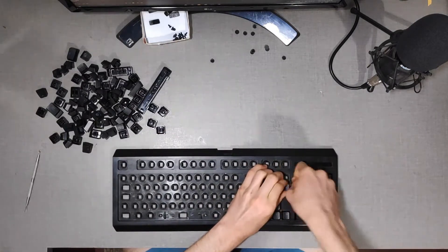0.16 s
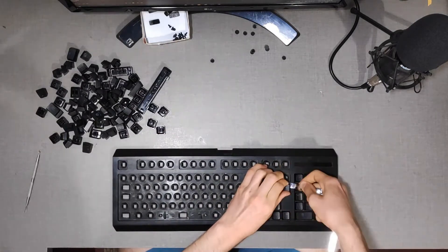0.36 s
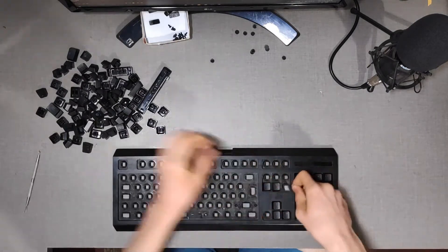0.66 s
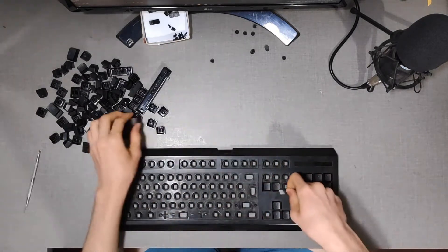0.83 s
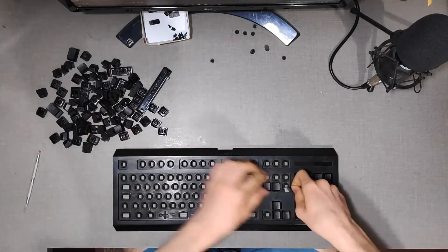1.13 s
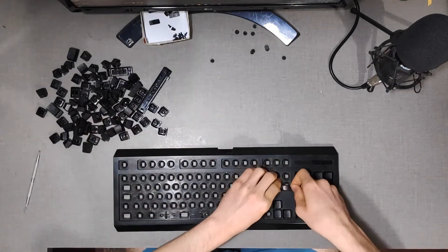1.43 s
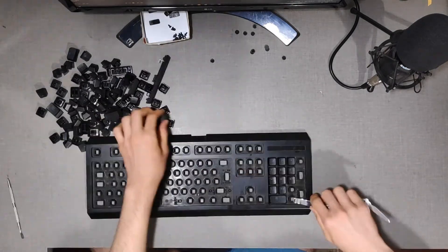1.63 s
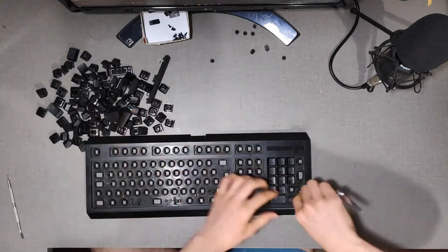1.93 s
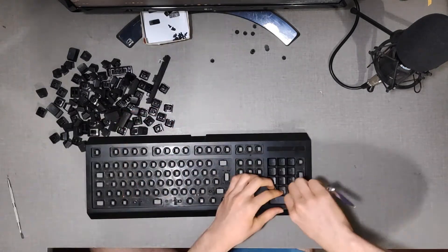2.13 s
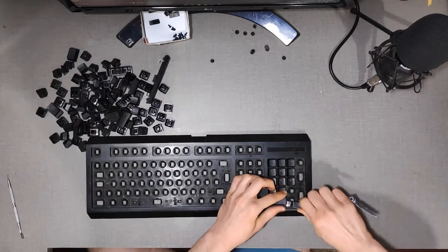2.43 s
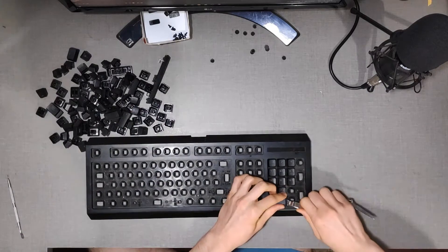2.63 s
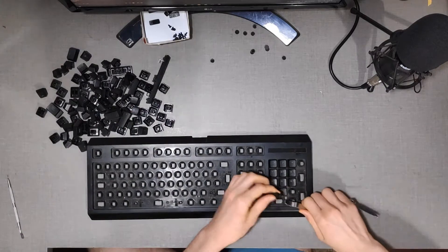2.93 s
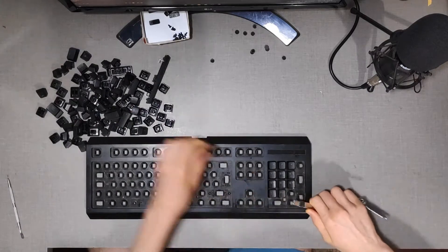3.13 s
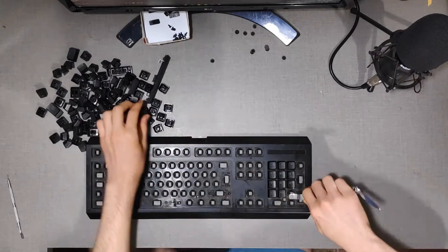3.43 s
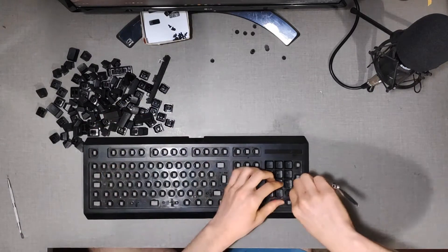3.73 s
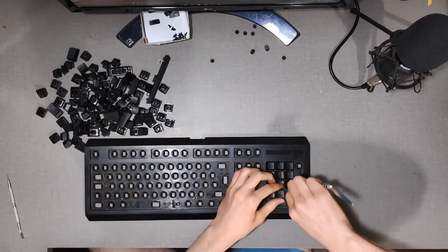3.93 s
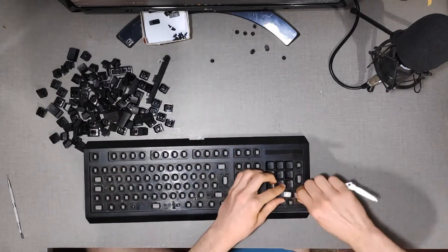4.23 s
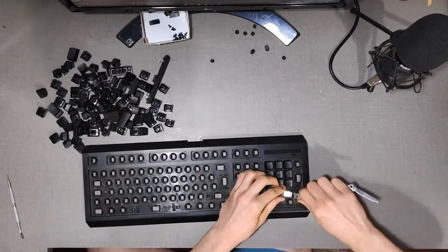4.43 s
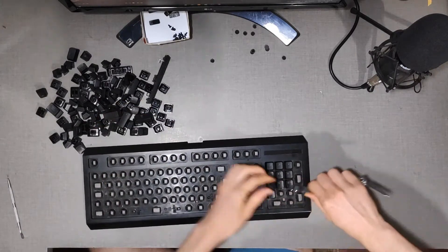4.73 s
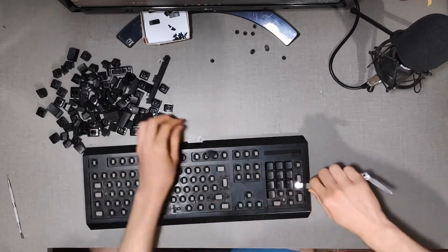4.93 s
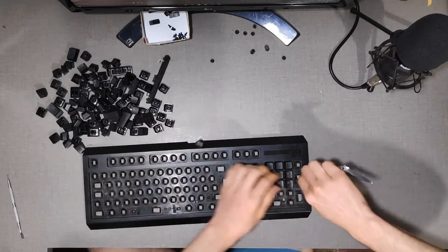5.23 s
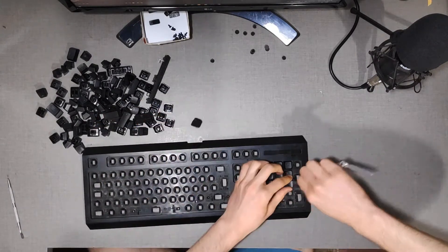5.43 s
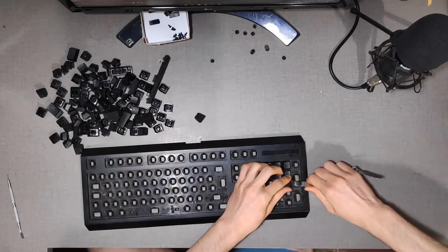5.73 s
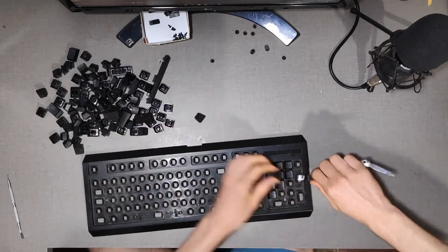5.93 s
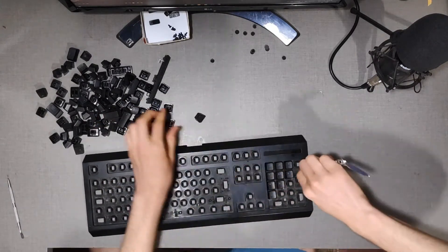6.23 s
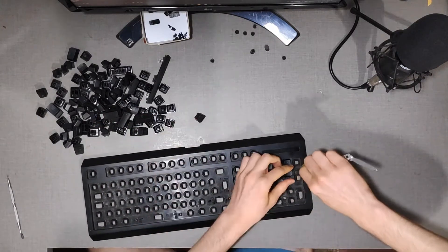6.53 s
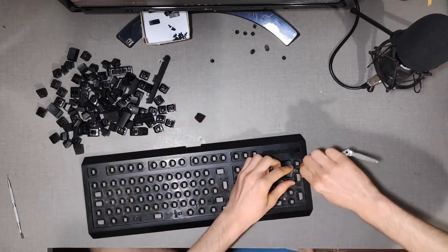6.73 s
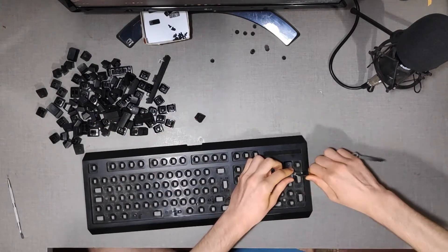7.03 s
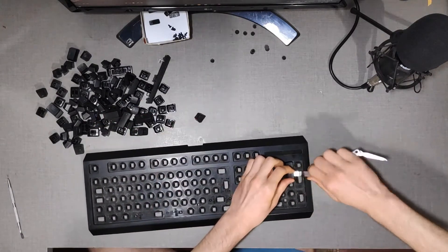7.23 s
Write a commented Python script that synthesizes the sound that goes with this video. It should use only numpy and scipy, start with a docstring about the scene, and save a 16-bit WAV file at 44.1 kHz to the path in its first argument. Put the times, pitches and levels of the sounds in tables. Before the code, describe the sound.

Plastic keycaps snap off a keyboard one by one and clatter lightly onto a pile of loose caps, with small scrapes and thumps.

```python
"""Pulling keycaps off a keyboard

Plastic caps are levered off and dropped on a pile of loose caps, on a desk in a small live room, heard close in stereo.
Snaps, clicks and pile ticks are short bursts ringing a resonant body, each with its own echo in the room.
Scrapes and the brushing of skin are coloured noise; thumps are noise through desk and case resonances.
Underneath lie a low rumble, a hum of two sine tones and a faint hiss."""
import sys
import numpy as np
from scipy import signal
from scipy.fft import rfft, irfft
from scipy.io import wavfile
from scipy.ndimage import uniform_filter1d

SR = 44100
rng = np.random.default_rng(int(sys.argv[2]) if len(sys.argv) > 2 else 0)


def master_out(mix):
    """Clip the mix to full scale and print it as 16-bit PCM to the path in sys.argv[1]."""
    frames = np.transpose(np.atleast_2d(mix))
    ceiling = np.clip(frames, -1, 1)
    pcm = np.round(ceiling * 32767).astype(np.int16)
    wavfile.write(sys.argv[1], SR, pcm)


N = 325017  # length of the sound in samples

# Levels in these tables are relative: each source adds its own overall gain.
# caps snapping off their stems, lighter clacks of cap and puller, and a few faint short ticks:
# [t/s, level/dB, knock passed to the case/dB, brightness/dB, attack/dB, strongest resonance f/Hz,
# strength of that resonance/dB]
SNAPS = [(0.092, -19.5, -12, -11.5, 5, 1150, -1), (0.1802, -25.5, -9.5, -11, -4, 1680, 5),
         (0.3295, -22, -10.5, -11.5, 3.5, 1520, 15), (0.3388, -31, -31, 2.5, 2, 1400, -12),
         (0.485, -60, -28, -3, 9, 1600, 22), (0.54, -48, -38, -9, 1, 1630, 23),
         (0.5859, -37.5, -34, -8, 4.5, 1700, 15), (1.319, -25.5, -6, -3.5, -8, 1820, 9),
         (1.571, -54.5, -2, 1.5, 1, 2010, 13), (1.637, -63, -8, -18, 19, 1900, -3),
         (2.0004, -24, -15.5, -3, 4.5, 2142, 5), (2.1404, -32, -15.5, -3.5, -14, 2400, 8),
         (2.3991, -43, -18, -5, 4.5, 1400, 11.5), (2.4543, -37.5, -23.5, -13.5, 8.5, 1460, -3.5),
         (2.609, -27.5, -4, -5, 5.5, 1740, 11), (2.8025, -25, -5.5, 1, 8, 1740, 7.5),
         (3.0149, -32.5, -4, -13.5, -2, 1840, 4), (3.836, -29, 1, -5, -14, 900, 3),
         (4.0042, -34, -17.5, -2, -1, 1570, -4), (4.0493, -28.5, -16, 0, 0, 2180, 9.5),
         (4.2806, -30.5, -12.5, -7.5, -6, 1020, 8.5), (4.467, -32.5, -22.5, -5.5, -9, 2260, 4),
         (4.5972, -23, -8, 3, -21, 1870, 9.5), (4.9889, -27.5, -3, 4, 0, 2080, 9.5),
         (5.6758, -27.5, -20, -1, 7, 2118, 10), (5.7622, -30, -17, -9, 15.5, 1920, 19.5),
         (5.7772, -34, -2, 10, -4, 1315, 8.5), (6.319, -31, -32, -9, -8, 1450, 11),
         (6.666, -32.5, -14, -5.5, 6, 2300, -4), (6.77, -28.5, -8.5, 3, 10, 2524, 7.5),
         (7.1363, -41.5, -44, -7, -6, 1980, 11), (7.3224, -34, -18.5, 3.5, 12.5, 3930, 21.5)]
# loose caps striking each other: [t/s, level/dB, cap wall resonance f/Hz, left minus right/dB]
CLICKS = [(0.908, -21.5, 7650, -3), (0.9154, -20.5, 9900, 8), (0.9248, -14, 6700, 4),
          (0.9592, -23.5, 7700, 3.5), (0.987, -18.5, 8400, 1), (1.0284, -19.5, 8800, 1),
          (1.1299, -26.5, 10600, 14), (1.154, -20.5, 6270, 5), (1.2023, -19.5, 7300, 1),
          (1.7964, -15.5, 8150, 0), (1.8887, -23, 6930, -3), (1.9323, -24, 9890, 8),
          (1.9717, -21.5, 8150, -1), (2.0673, -20.5, 8500, -13.5), (2.1174, -28.5, 7800, -10),
          (3.473, -26.5, 7410, -4), (3.4966, -26.5, 7600, 12), (3.6045, -21.5, 7960, -9.5),
          (3.642, -32, 8090, -26), (3.7793, -23, 7750, -6), (3.7917, -28, 7970, -4), (3.8008, -25, 7740, 0),
          (4.058, -25, 13000, 5), (5.086, -17.5, 7800, 2), (5.113, -24.5, 7600, 3),
          (5.1667, -23.5, 7150, -1), (5.2172, -15, 10100, 11), (5.221, -23, 7330, -13),
          (5.372, -23, 7200, -10.5), (5.5218, -29, 5400, -4), (6.317, -32, 7450, 16),
          (6.336, -17, 8095, -1), (6.4134, -24, 8000, -8), (6.4686, -27.5, 7200, -6),
          (6.482, -20, 7600, -5)]
# the pile shifting under a dropped cap or the hand: [t/s, length/s, level/dB]
PILE_SHIFTS = [(0.906, 0.19, -29), (1.108, 0.066, -30.5), (1.222, 0.086, -40), (1.771, 0.013, -37),
               (1.797, 0.2, -33), (3.471, 0.097, -33.5), (3.583, 0.063, -30), (3.808, 0.022, -25.5),
               (5.09, 0.17, -28.5), (5.363, 0.066, -28.5), (5.467, 0.2, -35), (6.319, 0.041, -28),
               (6.418, 0.073, -39.5), (6.527, 0.045, -26), (6.653, 0.015, -27)]
# fingers and puller scraping between the keys: [t/s, length/s, level/dB]
SCRAPES = [(0.079, 0.015, -28), (0.19, 0.03, -31), (0.535, 0.1, -45), (2.352, 0.046, -42.5),
           (2.64, 0.037, -28), (3.03, 0.035, -35), (3.69, 0.087, -35.5), (3.82, 0.089, -26),
           (4.24, 0.51, -42.5), (4.75, 0.049, -39.5), (5.3, 0.36, -33.5), (5.97, 0.028, -40),
           (6.53, 0.053, -39.5), (7.22, 0.073, -46)]
# low thumps of keyboard and desk, as the grip changes or a snap jolts them: [t/s, desk level/dB, case level/dB]
THUMPS = [(0.625, -34, -55), (1.629, -31, -52), (2.142, -40.5, -37), (2.37, -42.5, -40),
          (2.629, -31, -31.5), (2.82, -32, -36.5), (3.065, -31, -38), (3.79, -34, -42.5),
          (3.836, -29.5, -31), (3.895, -25.5, -32.5), (4.06, -41, -35), (4.618, -52, -35.5),
          (4.779, -42, -38.5), (5.33, -37.5, -48), (5.431, -60, -39), (5.78, -46, -38),
          (6.352, -40.5, -46.5), (6.53, -46, -47), (7.27, -42, -41.5)]
# the left hand is off the keyboard, carrying a cap to the pile: [leaves t/s, returns t/s, change of the brushing/dB]
CARRIES = [(0.68, 1.307, -1.5), (1.636, 2, -2), (3.16, 3.413, -15), (4.878, 5.286, -10),
           (6.035, 6.332, -12.5)]

# resonances of the desk top and of the keyboard case: [f/Hz, width/Hz, level/dB]
DESK_MODES = [(44, 9.7, -7), (63.7, 24, -8.5), (98.5, 6.6, 1.5), (118.3, 5, -7), (162.5, 21, -8),
              (197.5, 16, -13)]
CASE_MODES = [(271.3, 26.8, 6.5), (297.2, 24, 1), (342, 110, -5), (472, 21, -6.5), (536, 34, -5.5)]
# hollow resonances of the case under a snap: [f/Hz, width/Hz, lift/dB]
KNOCK_MODES = [(518, 30, 5), (752, 39, 6.5), (1082, 38, 6), (1340, 67, 3)]
# modes of a cap's thin walls, before a clean release adds to them: [f/Hz, width/Hz, lift/dB]
WALL_MODES = [(4050, 230, -1), (7600, 1500, 2.5)]

# tone colour of each kind of contact: [f/Hz, level/dB]
SNAP_COLOUR = [(100, 5), (280, 6.5), (600, 9), (950, 3), (1500, 5), (2700, 4), (4500, 3.5), (7600, 0),
               (9500, -4), (12000, -4), (15500, -16)]
CLICK_COLOUR = [(150, -34), (500, -10), (1000, -12.5), (2300, -8.5), (4500, -8.5), (6300, -4), (7700, -2),
                (9300, -7), (10800, -5), (13000, -10.5), (15500, -23.5)]
PILE_COLOUR = [(180, -20.5), (300, -8.5), (392, -9.5), (462, -5), (634, -33), (689, -6), (1120, -4.5),
               (1300, -6.5), (2070, -0.5), (5520, -3), (7820, -2.5), (12500, -12), (15200, -17.5),
               (16000, -56)]
SCRAPE_COLOUR = [(180, -13.5), (300, -6.5), (359, -13), (627, -9), (841, -11.5), (928, -15), (1110, -10),
                 (1940, -7), (2210, -9), (7060, -20.5), (12500, -29.5), (15000, -56.5)]
# tone colour of skin brushing over the keys: [f/Hz, level/dB]
BRUSH_COLOUR = [(300, -1.5), (1000, -6.5), (2300, 1.0), (4500, -5.5),
                (7500, 0.0), (10000, -5), (13500, -6), (15000, -34.5)]
# tone colour of the faint hiss: [f/Hz, level/dB]
HISS_COLOUR = [(200, 5.5), (1000, -1.5), (13500, 3.5), (15000, -32.0)]
# tone colour of the quiet room's rumble: [f/Hz, level/dB]
AIR_COLOUR = [(12, -59), (20, -21.5), (64, -18), (103, -12.5), (198, -16.5), (222, -30.5), (503, -46),
              (583, -33), (1000, -70), (1300, -105), (2200, -120)]
# tones of the hum carried by the desk: [f/Hz, level/dB]
HUM = [(64.6, -73.5), (96.9, -48.5)]
# time the echo takes to fall by 60 dB: [f/Hz, time/s]
ROOM_T60 = [(200, 0.24), (600, 0.36), (1500, 0.3), (4000, 0.34), (8000, 0.28), (15000, 0.28)]
# colour difference of the two microphone capsules: [f/Hz, left minus right/dB]
CAPSULES = [(90, -1), (200, 3.5), (700, -1.6), (2400, 0), (4400, -0.5), (6500, -4.5), (8300, -7.5),
            (10500, 5.5), (14000, 6.5)]

HIT_SIZE = 4096  # samples in one hit
TOP_HZ = 15900  # upper limit of the finished sound
AIR_DB = -48
SNAP_PAN_DB = -1.5  # left minus right
EDGE_DB = -1.5  # top octave of a snap, relative to its brightness
HAND_MOVE_S = 0.02  # time the hand takes to lift or settle
RECOIL_SLOPE = 0.72  # dB of recoil in desk and case for each dB of a snap's knock


def undb(db):
    """Turn decibels into a gain."""
    return 10 ** (np.asarray(db) / 20)


def along(points, hz):
    """Read a curve of (Hz, value) points, spaced along frequency as pitch is heard (logarithmically)."""
    f, value = np.transpose(points)
    return np.interp(np.log(np.maximum(hz, 1)), np.log(f), value)


def unit(x):
    """Scale to an average strength (rms) of 1."""
    return x / np.sqrt(np.mean(x ** 2) + 1e-18)


def tint(x, points):
    """Colour a full-length sound by (Hz, dB) points."""
    hz = np.fft.rfftfreq(N, 1 / SR)
    return irfft(rfft(x) * undb(along(points, hz)), N)


def pair(likeness, size):
    """Noise at two capsules; likeness 1 makes both the same, 0 makes them independent."""
    shared, opposed = rng.standard_normal((2, size))
    c = np.clip(likeness, -1, 1)
    return np.sqrt((1 + c) / 2) * shared + np.sqrt((1 - c) / 2) * np.array([opposed, -opposed])


def panned(x, pan_db):
    """Lean a sound to the left (positive) or right (negative)."""
    return x * undb(np.array([[pan_db], [-pan_db]]) / 2)


def add(out, s, x):
    """Mix a short sound in at time s."""
    i = max(int(s * SR), 0)
    out[:, i:i + x.shape[1]] += x[:, :max(N - i, 0)]


def gesture(rows, attack_s, sag_db_per_s, release_s):
    """Gain of (s, length s, dB) strokes: each swells, sags while it lasts, then dies away."""
    t, gain = np.arange(SR) / SR, np.zeros((1, N))
    for s, length_s, db in rows:
        swell = np.minimum(t / attack_s, 1)
        fade = np.exp(-np.maximum(t - length_s, 0) / release_s)
        add(gain, s, (swell * fade * undb(db - sag_db_per_s * t))[None])
    return gain[0]


def lifted():
    """For each carry, how far the left hand is off the keys (0-1)."""
    t = np.arange(N) / SR
    return np.array([np.clip(np.minimum(t - leaves, returns - t) / HAND_MOVE_S + .5, 0, 1)
                     for leaves, returns, _ in CARRIES])


def bump(hz, centre_hz, width_hz):
    """Bell shape of one resonance, 1 at its centre."""
    return 1 / (1 + (2 * (hz - centre_hz) / width_hz) ** 2)


def modal(depth_db, size):
    """Peaks and dips (dB) of the many small modes that one contact happens to excite."""
    rough = rng.standard_normal(HIT_SIZE // 2 + 1)
    return depth_db * unit(uniform_filter1d(uniform_filter1d(rough, size), size))


def bare_ring(db):
    """The ring of a body after one ideal tap, given its gain (dB) at each frequency."""
    cepstrum = irfft(np.log(undb(db)))
    cepstrum[1:HIT_SIZE // 2] *= 2
    cepstrum[HIT_SIZE // 2 + 1:] = 0  # causal: the ring follows the blow
    return irfft(np.exp(rfft(cepstrum)))[None]


def strike(force, ring, likeness):
    """A burst of tiny contacts, as strong as the force, sets a body ringing."""
    burst = pair(likeness, HIT_SIZE) * force
    burst *= np.sqrt(np.sum(force ** 2) / np.sum(burst ** 2, axis=1, keepdims=True))
    return irfft(rfft(burst) * rfft(ring))


def grains(per_s, spread_db, ring_s):
    """Random contacts of very unequal size, each a short burst; levelled over about 60 ms."""
    timing, size = rng.random((2, N))
    energy = (timing < per_s / SR) * undb(-spread_db * np.log(np.maximum(size, .01))) ** 2
    energy = signal.lfilter([1], [1, -np.exp(-2 / (ring_s * SR))], energy) + 1e-6
    average = np.maximum(uniform_filter1d(energy, size=2600), 1e-6)
    return pair(0.12, N) * np.sqrt(energy / average)


def ringing(modes, likeness):
    """Resonances pushed by an irregular force, held near rms 1."""
    push, x = pair(likeness, N), 0
    for hz, width, db in modes:
        band = signal.butter(2, [hz - width / 2, hz + width / 2], "band", fs=SR, output="sos")
        x = x + undb(db) * unit(signal.sosfilt(band, push))
    return x / np.sqrt(uniform_filter1d(np.mean(x ** 2, axis=0), size=4400) + 1e-6)


def room(x, diffuse_hz=1300):
    """Echo of the walls: each frequency band fades at its own rate, and long waves reach both capsules alike."""
    t = np.arange(SR * 3 // 4) / SR
    hz = np.fft.rfftfreq(len(t), 1 / SR)
    mid, side = rfft(rng.standard_normal((2, len(t))))
    apart = np.minimum(hz / diffuse_hz, 1)
    noise, tail = (mid + apart * np.array([side, -side])) / np.sqrt(1 + apart ** 2), 0
    for k, (_, t60) in enumerate(ROOM_T60):
        share = along([(f, j == k) for j, (f, _) in enumerate(ROOM_T60)], hz)
        tail = tail + irfft(noise * share, len(t)) * np.exp(-np.log(1000) * t / t60)
    tail *= 1 - np.exp(-(t / 0.0053) ** 2)  # the first echoes come from desk and screen
    return signal.oaconvolve(x, unit(tail) / np.sqrt(len(t)), axes=1)[:, :N]


def background(hum_db=-4, hiss_db=-68):
    """Low room rumble and faint hiss from coloured noise, and a hum in the desk from steady sine tones."""
    t, hum = np.arange(N) / SR, 0
    for hz, db in HUM:
        hum = hum + np.sqrt(2) * undb(db + hum_db) * np.sin(2 * np.pi * (hz * t + rng.random()))
    rumble = undb(AIR_DB) * unit(tint(pair(0.54, N), AIR_COLOUR))
    hiss = undb(hiss_db) * unit(tint(pair(.1, N), HISS_COLOUR))
    return hum + rumble + hiss


def brushing(db=-54):
    """Soft hiss of skin moving over the keys, which falls while the hand is lifted."""
    change_db = np.array(CARRIES)[:, 2] @ lifted()
    return unit(tint(pair(0.059, N), BRUSH_COLOUR)) * undb(db + change_db)


def thumps(desk_db=3, case_db=4, desk_s=0.096, case_s=0.054, rise_s=0.0047, pressure_db=-41, creak_db=-16,
           recoil_desk_db=-11.5, recoil_case_db=-16.5, lifted_db=-18):
    """Bumps and the recoil of snaps set case and desk top ringing; the resting hands keep both stirring."""
    t, held = np.arange(N) / SR, undb(lifted_db * lifted().sum(axis=0))
    weight = undb(pressure_db) * held
    desk_energy, case_energy = weight ** 2, (weight * undb(creak_db)) ** 2
    recoils = []
    for s, level_db, knock_db, *_ in SNAPS:
        recoil_db = RECOIL_SLOPE * (level_db + knock_db)
        recoils.append((s, recoil_db + recoil_desk_db, recoil_db + recoil_case_db))
    for s, bump_db, knock_db in THUMPS + recoils:
        i = int(s * SR)
        age = t[:min(N - i, SR)]
        push = 1 - np.exp(-age / rise_s)
        desk_gain = held[i] * undb(bump_db + desk_db)  # a lifted hand bumps the desk less
        desk_energy[i:i + len(age)] += (desk_gain * push * np.exp(-age / desk_s)) ** 2
        case_energy[i:i + len(age)] += (undb(knock_db + case_db) * push * np.exp(-age / case_s)) ** 2
    desk = ringing(DESK_MODES, 1.0) * np.sqrt(desk_energy)
    case = ringing(CASE_MODES, 0.75) * np.sqrt(case_energy)
    return desk + case


def scrapes(db=-3, room_db=1):
    """Fingers and puller catch and slip on the keys: many tiny bursts of noise under each stroke."""
    effort = gesture(SCRAPES, attack_s=0.012, sag_db_per_s=18, release_s=0.012)
    contacts = unit(tint(grains(per_s=380, spread_db=4.0, ring_s=0.0052), SCRAPE_COLOUR))
    slips = contacts * effort * undb(db)
    return slips + undb(room_db) * room(slips)


def snaps(db=7, room_db=29, clean_share=0.1, crack_s=0.0021, crack_gain_db=2, chatter_db=-3, chatter_s=0.02,
          slip_db=-26, slip_s=0.0049):
    """Snaps, clacks and ticks: a stem lets go with a crack, the cap chatters, its hollow and walls ring."""
    out, sent = np.zeros((2, N)), np.zeros((1, N))
    t, hz = np.arange(HIT_SIZE) / SR, np.fft.rfftfreq(HIT_SIZE, 1 / SR)
    colour = along(SNAP_COLOUR, hz) + db
    colour += sum(lift_db * bump(hz, f, width) for f, width, lift_db in KNOCK_MODES)
    for s, level_db, knock_db, bright_db, attack_db, hollow_hz, hollow_db in SNAPS:
        tilt = [(500, knock_db), (1600, 0.0026), (5500, bright_db), (11500, bright_db + EDGE_DB)]
        body_db = colour + level_db + along(tilt, hz)
        # a peak at the hollow's resonance, with its broad surroundings lowered (the reverse if negative)
        body_db += hollow_db * (bump(hz, hollow_hz, 780) - 0.49 * bump(hz, hollow_hz, 2500))
        clean_db = clean_share * max(attack_db, 0)  # a clean release rings the walls more
        body_db += sum((lift_db + clean_db) * bump(hz, f, width) for f, width, lift_db in WALL_MODES)

        crack = undb(attack_db + crack_gain_db) * np.exp(-t / crack_s)
        uneven = undb(0.87 * unit(uniform_filter1d(rng.standard_normal(HIT_SIZE), size=60)))
        chatter = undb(chatter_db) * uneven * np.exp(-t / chatter_s)
        force = (crack + chatter) * (1 - np.exp(-t / 0.00055))  # soft onset

        ring = bare_ring(body_db + modal(depth_db=4.0, size=13))
        sound = panned(strike(force, ring, 0.42), SNAP_PAN_DB)
        add(out, s, sound)
        add(out, s - slip_s, undb(slip_db) * sound)  # the stem slips a little before it gives
        # the room hears all sides of the cap, so its peaks and dips even out
        add(sent, s, bare_ring(body_db))
    return out + undb(room_db) * room(sent)


def pile(db=23, room_db=4, per_s=100, scatter_db=5.0, contact_s=0.00094, pan_db=-4, settle_s=0.03):
    """Neighbouring caps tick against each other, each with its own modes, until the pile settles."""
    out, sent = np.zeros((2, N)), np.zeros((1, N))
    effort = gesture(PILE_SHIFTS, attack_s=0.005, sag_db_per_s=6, release_s=settle_s)
    force = np.exp(-np.arange(HIT_SIZE) / SR / contact_s)
    force /= np.linalg.norm(force)
    colour = along(PILE_COLOUR, np.fft.rfftfreq(HIT_SIZE, 1 / SR))
    for start, length_s, _ in PILE_SHIFTS:
        for slot in np.arange(start, start + length_s + 2 * settle_s, 1 / per_s):
            s = slot + rng.random() / per_s
            scatter = scatter_db * np.clip(rng.standard_normal(), -2, 1.5)
            size = effort[int(s * SR)] * undb(db + scatter)
            ring = bare_ring(colour + modal(depth_db=4.5, size=26))
            tick = strike(force, ring, 0.14)
            add(out, s, size * panned(tick, pan_db + 4 * rng.standard_normal()))
            add(sent, s, size * ring)
    return out + undb(room_db) * room(sent)


def clicks(db=12, room_db=17, wall_db=7, contact_s=0.00048, rattle_db=-18, rattle_s=0.027, side_db=-5.5):
    """A cap lands on one edge and at once on another, setting its thin walls ringing, with a faint rattle."""
    out, sent = np.zeros((2, N)), np.zeros((1, N))
    t, hz = np.arange(HIT_SIZE) / SR, np.fft.rfftfreq(HIT_SIZE, 1 / SR)
    for s, level_db, wall_hz, pan_db in CLICKS:
        gap, size = rng.random(2)
        late = t - .0008 - 0.0018 * gap  # time since the second edge lands
        first_edge = np.exp(-t / contact_s)
        second_edge = np.sqrt(size) * (late > 0) * np.exp(-abs(late) / contact_s)
        rattle = undb(rattle_db) * np.exp(-t / rattle_s)
        body_db = along(CLICK_COLOUR, hz) + wall_db * bump(hz, wall_hz, 750) + level_db + db
        ring = bare_ring(body_db + modal(depth_db=4.5, size=20))
        sound = strike(first_edge + second_edge + rattle, ring, 0.093)
        add(out, s, panned(sound, pan_db))
        add(sent, s, bare_ring(body_db))  # the room gets the ring without the small modes
    return panned(out, side_db) + undb(room_db) * room(sent)


def scene():
    """Caps, pile and hands over the quiet room."""
    return background() + brushing() + thumps() + scrapes() + snaps() + pile() + clicks()


def record(dry):
    """Each capsule adds its own colour, the loudest peaks are rounded, and the top is cut."""
    sides = [tint(x, [(hz, sign * db / 2) for hz, db in CAPSULES]) for x, sign in zip(dry, (1, -1))]
    rounded = .9 * np.tanh(np.array(sides) / .9)
    low_pass = signal.ellip(8, .2, 70, TOP_HZ, fs=SR, output="sos")
    return signal.sosfilt(low_pass, rounded)


dry = scene()
out = record(dry)
master_out(out)
```